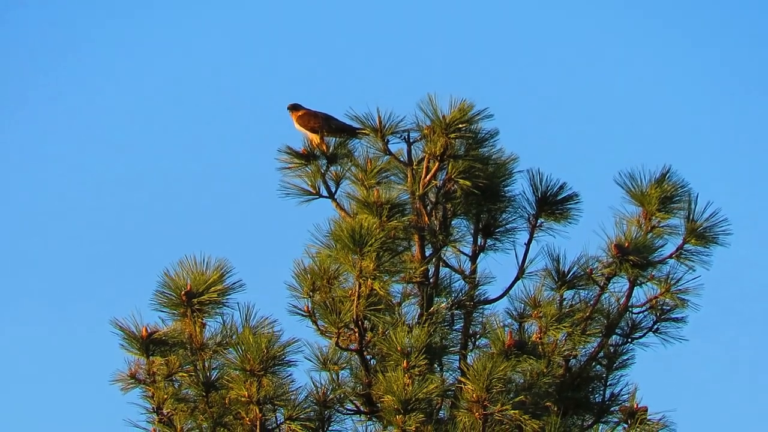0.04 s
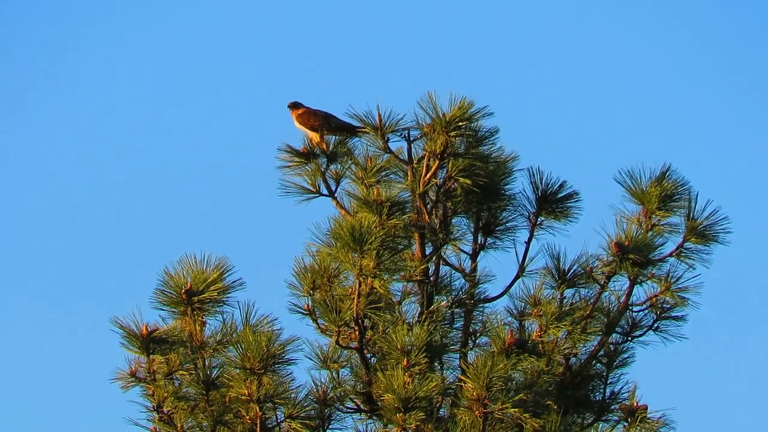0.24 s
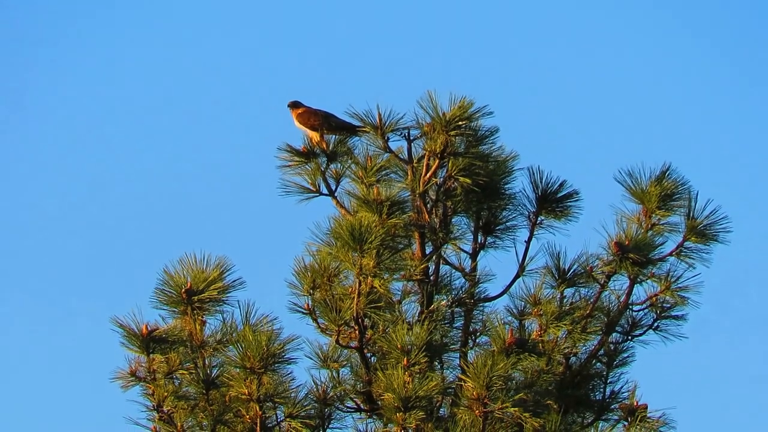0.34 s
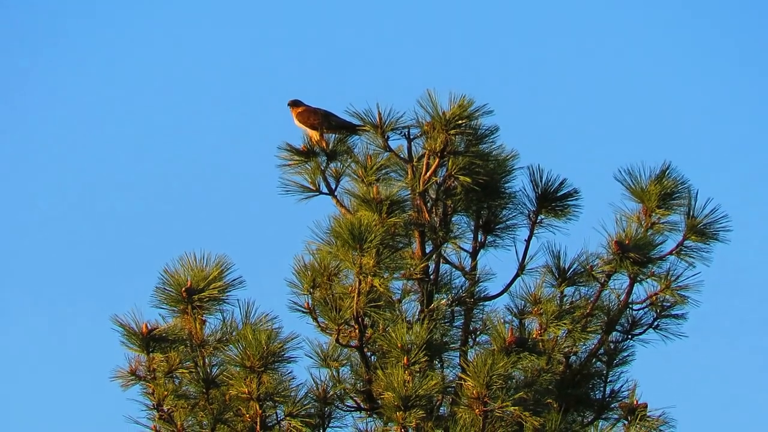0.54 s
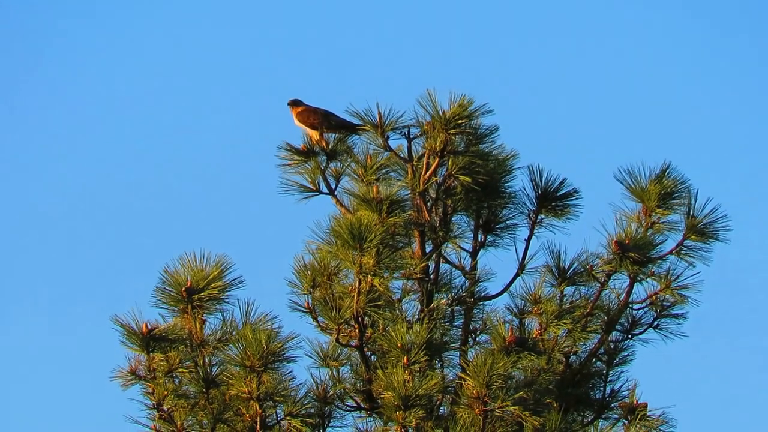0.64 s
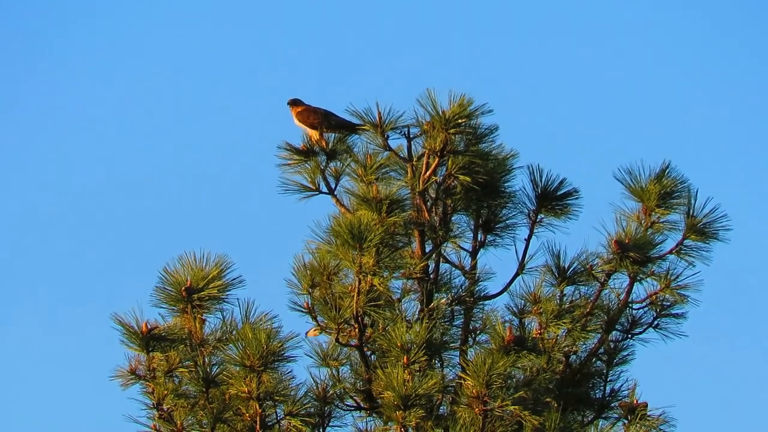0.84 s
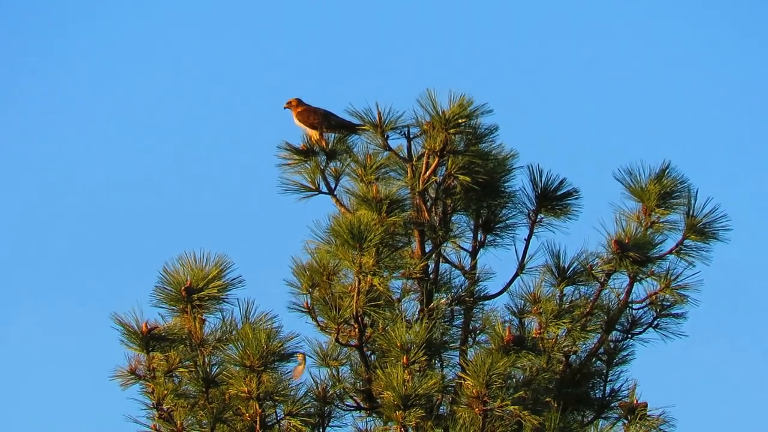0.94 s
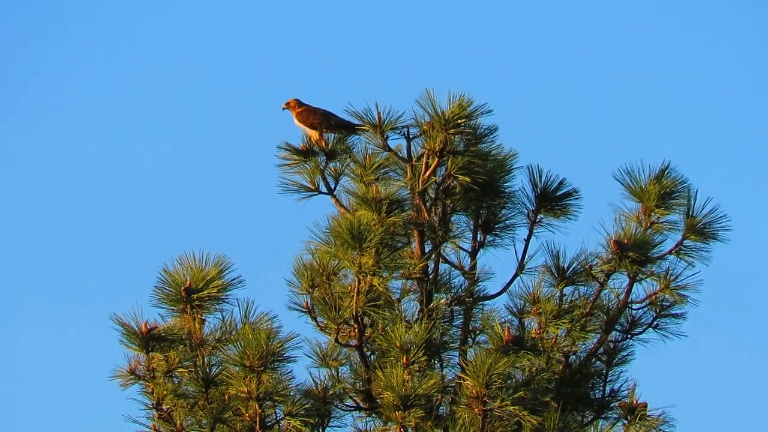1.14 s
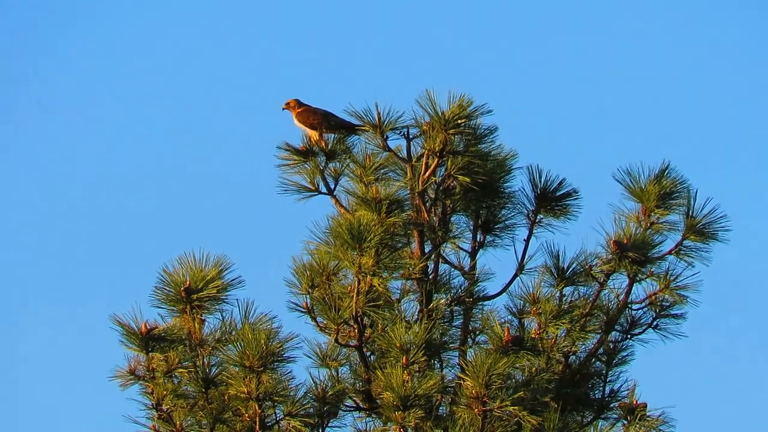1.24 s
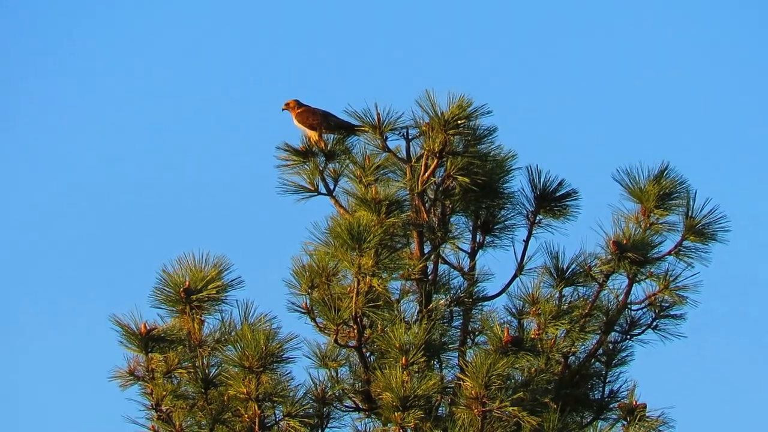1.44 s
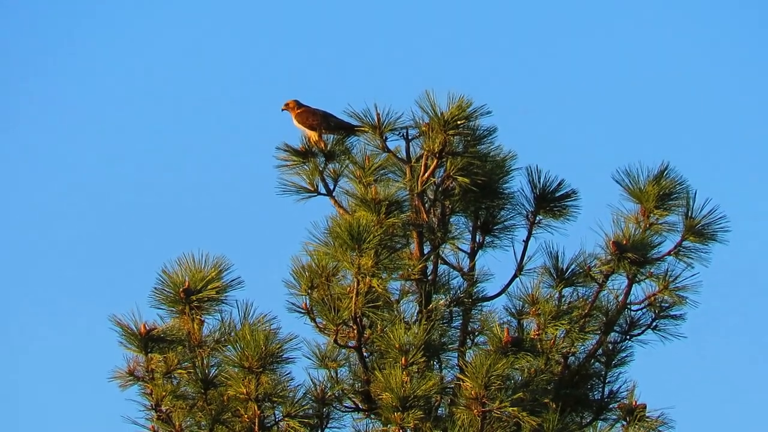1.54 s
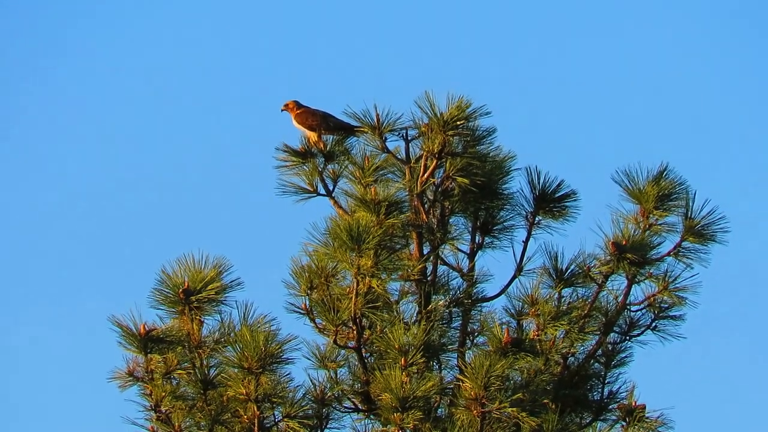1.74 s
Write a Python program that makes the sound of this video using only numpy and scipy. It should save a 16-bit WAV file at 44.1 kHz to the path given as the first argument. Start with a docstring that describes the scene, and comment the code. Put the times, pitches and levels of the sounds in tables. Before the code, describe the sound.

A bird scolds in short, harsh, raspy notes: five in a quick run, a pause with low wind thumps, then three more. Open outdoor hush, faint tree echoes, microphone lightly buffeted by wind.

```python
"""A quiet outdoor hush and soft wind come first; then a bird scolds among pines in two quick, harsh series.
Each call is a train of pulses whose pitch arches, while a slower flutter shakes it into a rasp.
The trees echo the voice, and faint calls answer from farther off.
Wind bumps the microphone: low noise follows the gusts, with single pushes of pressure.
The hush is steady coloured noise, and a few faint high ticks are short bursts of noise."""
import sys
import numpy as np
from scipy import signal
from scipy.fft import rfft, irfft, next_fast_len
from scipy.io import wavfile
from scipy.ndimage import uniform_filter1d, map_coordinates

SR = 44100
rng = np.random.default_rng(int(sys.argv[2]) if len(sys.argv) > 2 else 0)


def waveform_to_disk(signal):
    """Save audio, clipped to [-1, 1], as 16-bit WAV at the path in sys.argv[1]."""
    frames = np.transpose(np.atleast_2d(signal))
    scaled = np.clip(frames, -1, 1) * 32767
    samples = np.round(scaled).astype(np.int16)
    wavfile.write(sys.argv[1], SR, samples)


N = 79380  # length in samples (1.8 s)


def amp(db):
    """Turn decibels into a gain."""
    return 10 ** (np.asarray(db) / 20)


def unit(x):
    """Scale a sound to an average strength (rms) of 1."""
    return x / np.sqrt(np.mean(x ** 2) + 1e-20)


def along(points, hz):
    """Read a curve of (Hz, value) points, with frequency on a log axis."""
    point_hz, value = np.transpose(points)
    return np.interp(np.log(hz + 1), np.log(point_hz + 1), value)


def wobble(rate):
    """Make a smooth random curve with this many random points a second."""
    knots = rng.standard_normal(int(N * rate / SR) + 4)
    return map_coordinates(knots, [np.arange(N) * rate / SR])


def filtered(x, response):
    """Multiply the spectrum of a sound by a response that depends on frequency."""
    m = next_fast_len(N + SR // 2)
    hz = np.fft.rfftfreq(m, 1 / SR)
    return irfft(rfft(x, m) * response(hz), m)[..., :N]


def resonate(x, gain):
    """Give a sound the wanted gain at each frequency, ringing only after each pulse, never before."""
    size = 2048
    hz = np.fft.rfftfreq(size, 1 / SR)
    cepstrum = irfft(np.log(np.maximum(gain(hz), 1e-6)))
    # folding the cepstrum forward in time gives the minimum-phase filter
    cepstrum[1:size // 2] *= 2
    cepstrum[size // 2 + 1:] = 0
    ringing = irfft(np.exp(rfft(cepstrum)))
    return signal.fftconvolve(x, ringing)[:N]


def rush(spectrum, alike):
    """Coloured stereo noise of rms 1; more shared noise makes left and right more alike."""
    def shares(hz):
        angle = np.arccos(np.clip(along(alike, hz), -1, 1)) / 2
        return amp(along(spectrum, hz)) * [np.cos(angle), np.sin(angle)]

    mid, side = filtered(rng.standard_normal((2, N)), shares)
    return unit(np.array([mid + side, mid - side]))


def pulses(times, sizes):
    """Clicks at exact times, even between samples, each drawn as a short windowed sinc."""
    at = times[:, None] * SR
    taps = np.floor(at).astype(int) + np.arange(-7, 9)
    shape = np.sinc(taps - at) * np.cos(np.pi * (taps - at) / 16) ** 2
    return np.bincount(np.clip(taps, 0, N - 1).ravel(), (sizes[:, None] * shape).ravel(), N)


def bird():
    """All calls, straight ahead, with their echoes; the high treble differs between the two ports."""
    # the scolding calls; levels are before the voice trim, pitch and flutter before they arch:
    # middle_s, length_s, level_db, pitch_hz, pitch_rise (share over the call), flutter_hz,
    # treble_db, beak_hz (resonance), beak_db (its lift)
    scolds = [(0.257, .042, -41, 829.6, .04, 140, -0.5, 3960, 2),
              (0.344, .051, -40, 826, 0.018, 166, -1.5, 4040, 2.5),
              (0.443, 0.051, -38, 867.4, 0.093, 142, -1, 2350, 2),
              (0.554, 0.053, -37, 879.6, 0.12, 142, 0, 5060, 4),
              (0.666, 0.056, -37.5, 889, .11, 172, 0.5, 3000, 4.5),
              (1.262, .043, -39, 846, 0.039, 157, -0.5, 2770, 2.5),
              (1.358, 0.051, -35.5, 856, .04, 142, 1, 3140, 6.5),
              (1.475, 0.051, -37, 841.5, .03, 140, 2, 2270, 2.5)]
    # faint answers from farther off: same columns
    answers = [(.388, .035, -57, 940, .03, 150, -3, 1900, 6),
               (.603, .042, -52.5, 900, .05, 150, -1, 2500, 4),
               (.755, .06, -56.5, 880, .03, 150, -3, 2650, 6)]
    linger_s, linger_hz = .004, 3554

    def linger(hz):
        # the throat holds low tones longer than high ones
        return np.exp(2j * np.pi * linger_s * (linger_hz * np.exp(-hz / linger_hz) + hz / 2))

    def port_difference(hz):
        return 1j * amp(along([(2000, -18), (4500, -14), (8000, -3.5), (11000, 1.5)], hz))

    calls = sum(scold(*row) for row in list(scolds) + list(answers))
    voice = filtered(calls, linger)
    side = filtered(voice, port_difference)
    return np.array([voice + side, voice - side]) + trees(voice)


def scold(middle, length, level_db, pitch_hz, rise, flutter_hz, treble_db, beak_hz, beak_db):
    """One call: pulses bent and shaken by the flutter, plus air noise, through throat and beak."""
    # tone colour of the throat: frequency_hz, gain_db
    throat_curve = [(600, -17.5), (1050, -16), (1350, 4), (1540, -5.5), (1700, -2.5), (2050, -4),
                    (2360, -3), (2700, -6.5), (3240, -3), (3550, -7.5), (4450, -7), (5500, -16),
                    (6800, -24.5), (8100, -29), (9000, -36.5), (11200, -31), (12500, -38), (14000, -54)]
    throat_low_hz, throat_slope = 305, 3.7  # the voice fades steeply below this
    beak_width_hz = 380
    rise_share, fall_share = .40, .36  # shares of the call taken by its swell and fade
    pitch_drop = .10  # at both ends of the call, as a share
    # shares of pitch and of force, lopsidedness, and unsteadiness of the flutter's speed
    flutter_bend, flutter_depth, flutter_skew, flutter_wander = 0.099, 0.12, 0.6, .015
    jitter_s, scatter_db = .000016, .8  # uneven timing and size of the pulses
    breath_db, air_hz = -5, 7000  # air noise in the voice; it grows above this pitch
    bright_hz, bright_power = 4500, 0.28  # treble that follows a curve of its own
    ring_db = -10  # clear second harmonic within the rasp
    voice_db = -2

    t = np.arange(N) / SR
    u = np.clip((t - middle) / length, -.5, .5)  # place within the call
    ramp = np.minimum((.5 + u) / rise_share, (.5 - u) / fall_share)
    swell = np.sin(np.pi / 2 * np.clip(ramp, 0, 1))
    arch = 1 + rise * u - pitch_drop * (2 * u) ** 2

    flutter_speed = flutter_hz * arch * (1 + flutter_wander * wobble(150))
    turn = 2 * np.pi * (np.cumsum(flutter_speed) / SR + rng.random())
    flutter = np.sin(turn) + flutter_skew * np.sin(2 * turn)
    cycles = np.cumsum(pitch_hz * arch * (1 + flutter_bend * flutter)) / SR
    force = swell * (1 + flutter_depth * np.cos(turn))

    # one pulse for each whole cycle around the middle of the call
    chance = rng.standard_normal((2, 128))
    beats = np.interp(middle, t, cycles).round() + np.arange(-64, 64)
    times = np.interp(beats, cycles, t) + jitter_s * chance[0]
    tone = pulses(times, np.interp(times, t, force) * amp(scatter_db * chance[1]))

    # the air noise pulses in step with the tone
    air = rng.standard_normal(N) * force * (1 + np.cos(2 * np.pi * cycles))
    air = filtered(unit(air), lambda hz: np.sqrt(1 + (hz / air_hz) ** 4))

    def throat(hz):
        treble = treble_db * along([(1700, -1.1), (4000, -0.09), (9000, 3.2)], hz)
        beak = beak_db * np.exp(-((hz - beak_hz) / beak_width_hz) ** 2)
        low_fade = np.sqrt(1 + (throat_low_hz / (hz + 1)) ** throat_slope)
        return amp(along(throat_curve, hz) + treble + beak) / low_fade

    voice = resonate(unit(tone) + amp(breath_db) * air, throat)
    bright = filtered(voice, lambda hz: hz ** 4 / (hz ** 4 + bright_hz ** 4))
    # the treble swells later and fades sooner than the rest
    voice = voice + bright * (swell ** bright_power - 1)
    ring = swell * np.sin(4 * np.pi * np.cumsum(pitch_hz * arch) / SR)
    voice = unit(voice) + amp(ring_db) * unit(ring)
    return amp(level_db + voice_db) * unit(voice) * np.sqrt(np.mean(swell ** 2))


def trees(x):
    """Scattered echoes from the nearest trees, and the soft tail of the wood as fading noise."""
    # time for the wood's tail to fall by 60 dB: frequency_hz, fade_s
    wood_fade = [(1000, 0.18), (3000, 0.27), (10000, 0.53)]
    # nearest trees: delay_s, level_db
    near_trees = [(0.048, -23), (0.094, -27)]
    spread_s, wood_db = 0.0086, -19  # blur of each echo; level of the tail

    hz, t, cells = signal.stft(rng.standard_normal((2, SR // 2)), SR, nperseg=256)
    fade = amp(-60 * t / along(wood_fade, hz)[:, None])
    tail = signal.istft(cells * fade, SR, nperseg=256)[1]
    t = np.arange(tail.shape[1]) / SR
    answer = amp(wood_db) * tail / np.linalg.norm(tail[0])
    for delay, db in near_trees:
        echo = rng.standard_normal(len(t)) * np.exp(-((t - delay) / spread_s) ** 2)
        answer = answer + amp(db) * echo / np.linalg.norm(echo)
    return signal.fftconvolve(x[None], answer, axes=1)[:, :N]


def wind():
    """Two depths of rumble that rise and fall with the gusts, plus single pushes of pressure."""
    # tone colour of the rumble: frequency_hz, gain_db
    rumble_colour = [(50, -29), (80, 1), (140, -1.5), (200, -6.5), (300, -19.5), (450, -26), (700, -62)]
    # wind on the microphone, before the cap, trim and bass cut: time_s, level_db
    gust_levels = [(0.0, -59), (0.02, -69), (0.09, -65), (0.13, -45.5), (0.16, -47.5), (0.18, -65.5),
                   (0.25, -47.5), (0.284, -64), (0.32, -42), (0.354, -59), (0.38, -49), (0.486, -67.5),
                   (0.66, -65.5), (0.696, -67), (0.756, -26.5), (0.782, -23), (0.816, -45.5),
                   (0.852, -29.5), (0.896, -46), (1.042, -40.5), (1.062, -45.5), (1.088, -43), (1.112, -58),
                   (1.142, -43), (1.162, -56), (1.198, -38), (1.228, -48), (1.252, -36), (1.268, -45),
                   (1.298, -48), (1.408, -61), (1.508, -36), (1.554, -60), (1.594, -52.5), (1.624, -71),
                   (1.788, -57), (1.8, -65)]
    # tone colour of the deepest rumble: frequency_hz, gain_db
    deep_colour = [(15, -36), (30, -20), (50, 3.5), (70, 1), (100, -13), (200, -69)]
    # deepest rumble, before the cap, trim and bass cut: time_s, level_db
    deep_levels = [(0.0, -66), (0.124, -63), (0.144, -53), (0.334, -52.5), (0.36, -62), (0.416, -53),
                   (0.476, -83), (0.566, -58), (0.63, -75), (0.782, -44), (0.862, -64), (1.016, -37),
                   (1.162, -74), (1.192, -41), (1.258, -45), (1.398, -53), (1.428, -42.5), (1.678, -72),
                   (1.738, -59), (1.8, -60)]
    # single pushes, before the port lag and bass cut: middle_s, peak_db, half_length_s
    pushes = [(.757, -31, .0012), (.779, -25, .0035), (0.851, -36, 0.0021), (.867, -36, .001),
              (1.0146, -30.5, 0.0034), (1.037, -29.5, 0.0019), (1.078, -43, 0.0021), (1.2629, -21, 0.0022)]
    wind_db, deep_db = -1.0, 3
    port_lag_s, port_cut_hz = .0007, 45

    t = np.arange(N) / SR
    out = amp(wind_db) * gusting(rumble_colour, gust_levels)
    out = out + amp(deep_db) * gusting(deep_colour, deep_levels)
    for middle, db, half in pushes:
        # a push reaches the two ports at slightly different moments
        u = (t - middle - port_lag_s * rng.standard_normal((2, 1))) / half
        out = out + amp(db) * u * np.exp((1 - u ** 2) / 2)
    # the ports lose the deepest bass
    return filtered(out, lambda hz: hz ** 2 / (hz ** 2 + port_cut_hz ** 2))


def gusting(spectrum, levels):
    """Rumble evened out in strength, then made to follow a level curve up to a cap."""
    # likeness of left and right in the wind: frequency_hz, likeness (-1 to 1)
    wind_alike = [(30, -0.26), (70, 1), (140, 0.57), (260, 0.046)]
    cap_db = -32.5
    rumble = rush(spectrum, wind_alike)
    power = uniform_filter1d(np.mean(rumble ** 2, axis=0), size=1800)
    rumble = rumble / np.sqrt(abs(power) + 1e-6)
    level_db = np.interp(np.arange(N) / SR, *np.transpose(levels))
    return amp(np.minimum(level_db, cap_db)) * rumble


def hush():
    """The far-off noise of the outdoors: coloured noise with a very slight waver in level."""
    # tone colour of the bass: frequency_hz, gain_db
    bass_colour = [(25, -9), (70, -2), (200, -3)]
    # tone colour above the bass; the first and last rows are left out below: frequency_hz, gain_db
    hush_colour = [(160, -33), (280, -4.5), (460, -4), (499, -4), (533, -6.5), (890, -4), (966, -2),
                   (1300, -13.5), (1810, -11.5), (2600, -17.5), (3450, -18.5), (5560, -25), (7130, -28),
                   (12900, -33.5), (14500, -46)]
    # likeness of left and right: frequency_hz, likeness (-1 to 1)
    hush_alike = [(40, .85), (100, .5), (250, .05), (500, .35), (1000, 0.31), (3000, 0.1), (10000, 0.023)]
    level_db = -55 + .4 * wobble(6.55)
    return amp(level_db) * rush(list(bass_colour) + list(hush_colour[1:-1]), hush_alike)


def ticks():
    """A few faint high ticks: narrow or wide bands of noise under short bell-shaped swells."""
    # middle_s, level_db, pitch_hz, width_hz, half_length_s
    tick_rows = [(.035, -62, 7000, 250, .004), (1.411, -57, 6200, 1100, .0015),
                 (1.42, -58, 9000, 4000, .001)]
    t = np.arange(N) / SR
    out = np.zeros(N)
    for middle, db, pitch, width, half in tick_rows:
        noise = filtered(rng.standard_normal(N), lambda hz: np.exp(-((hz - pitch) / width) ** 2))
        out = out + amp(db) * np.exp(-((t - middle) / half) ** 2) * unit(noise)
    return out


def scene():
    """Bird, wind and background together."""
    return bird() + wind() + hush() + ticks()


def record(dry):
    """The microphone dulls the top, and nothing above its band limit is kept."""
    # tone colour of the microphone: frequency_hz, gain_db
    mic_colour = [(30, -9.5), (70, 1.5), (11300, 0.5), (12500, -7), (14000, -17)]
    top_hz = 14600
    return filtered(dry, lambda hz: amp(along(mic_colour, hz)) * (hz < top_hz))


dry = scene()
out = record(dry)
waveform_to_disk(out)
```